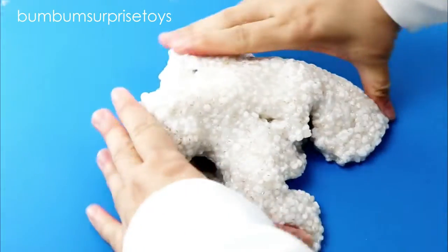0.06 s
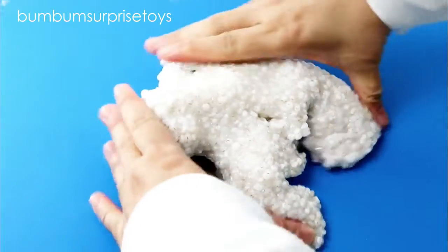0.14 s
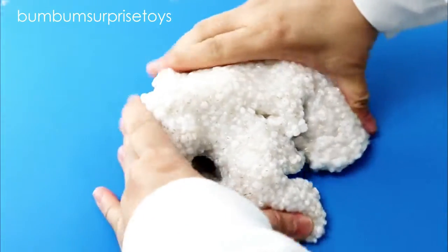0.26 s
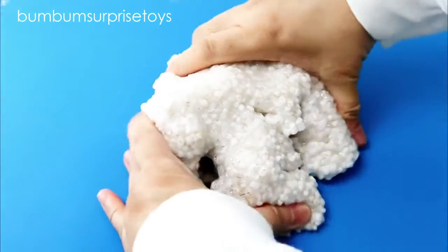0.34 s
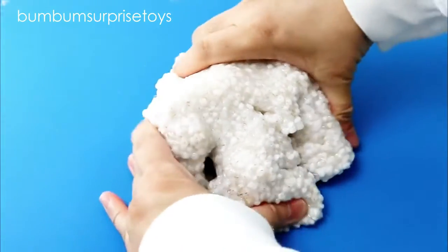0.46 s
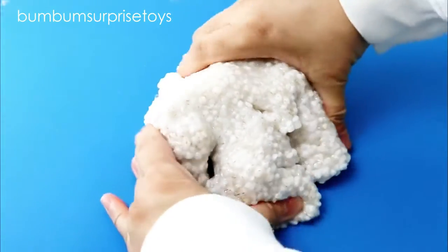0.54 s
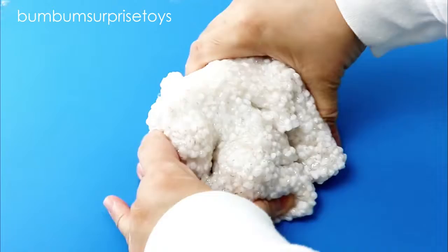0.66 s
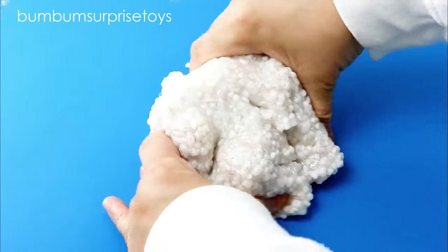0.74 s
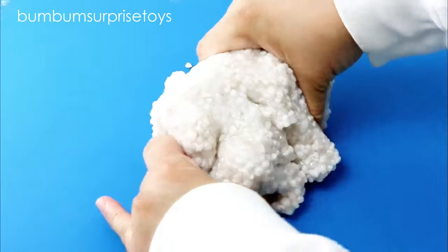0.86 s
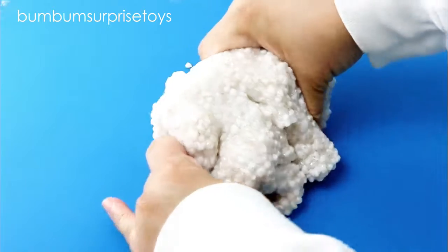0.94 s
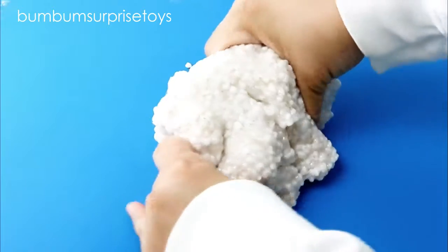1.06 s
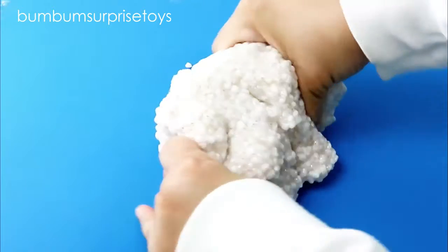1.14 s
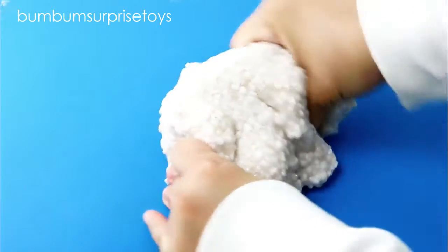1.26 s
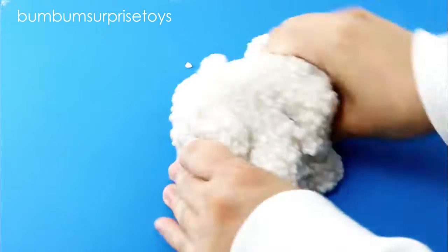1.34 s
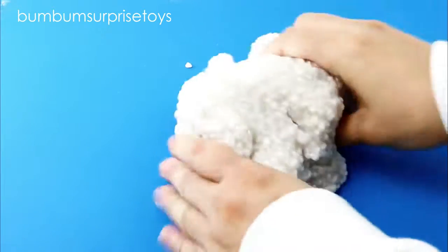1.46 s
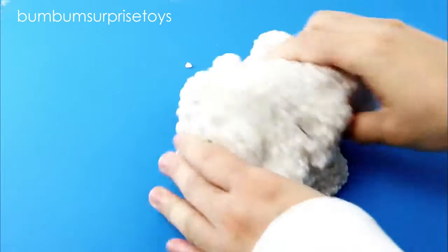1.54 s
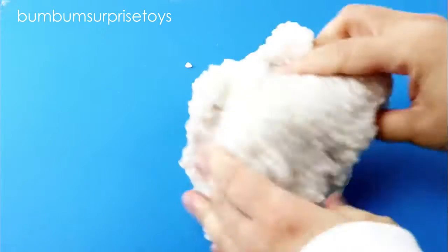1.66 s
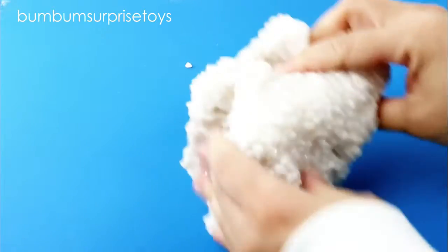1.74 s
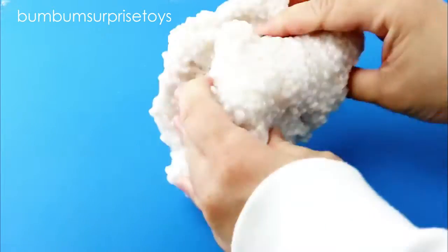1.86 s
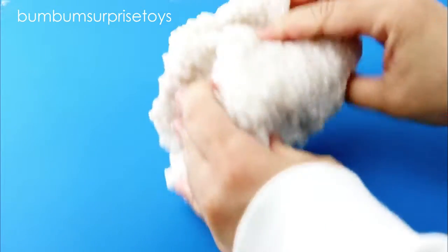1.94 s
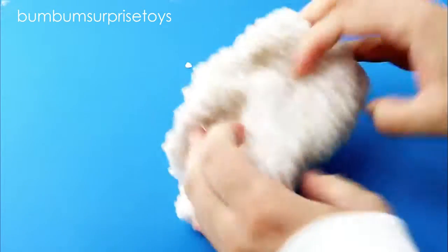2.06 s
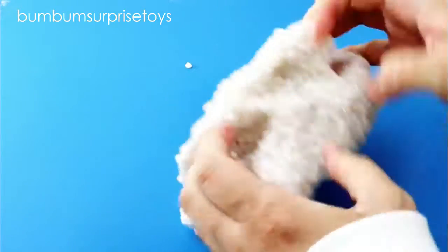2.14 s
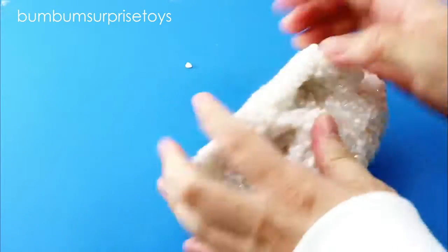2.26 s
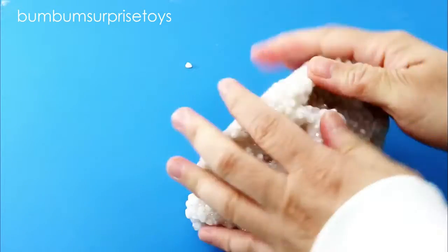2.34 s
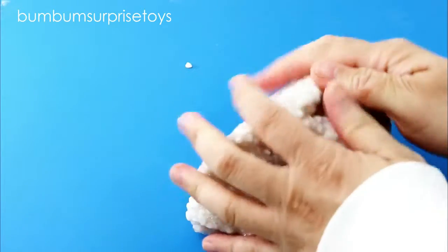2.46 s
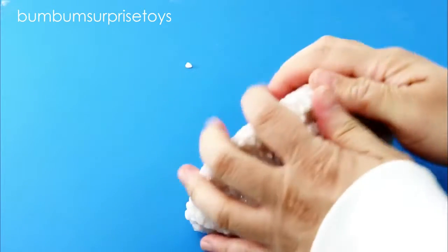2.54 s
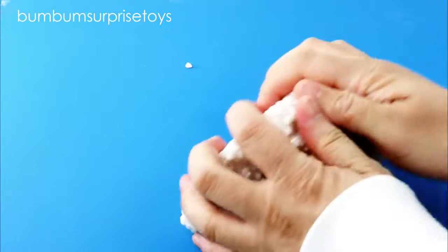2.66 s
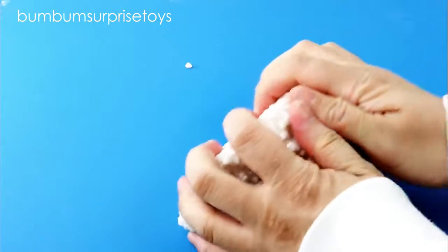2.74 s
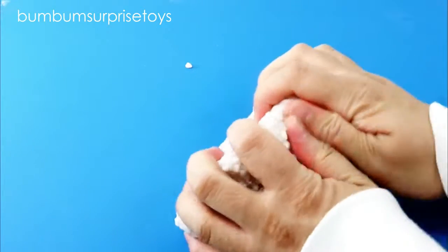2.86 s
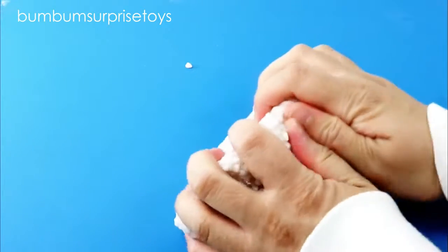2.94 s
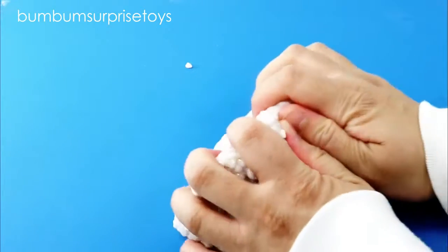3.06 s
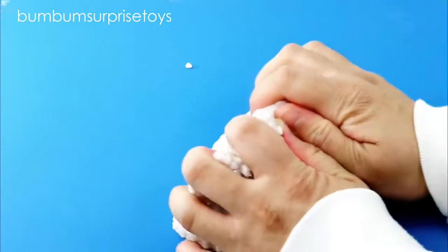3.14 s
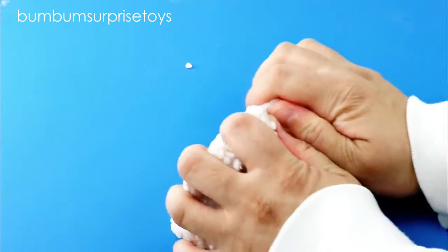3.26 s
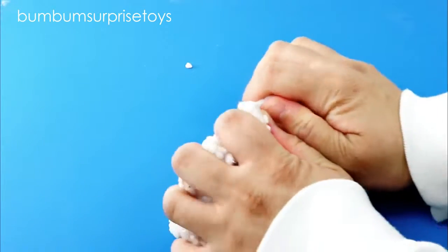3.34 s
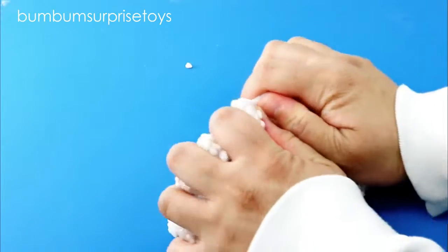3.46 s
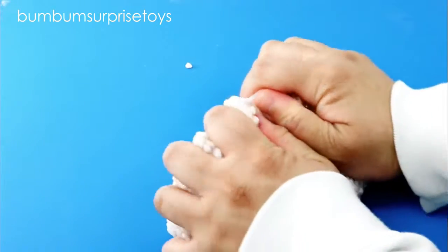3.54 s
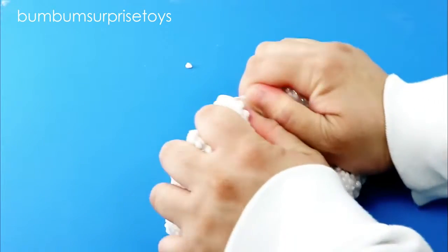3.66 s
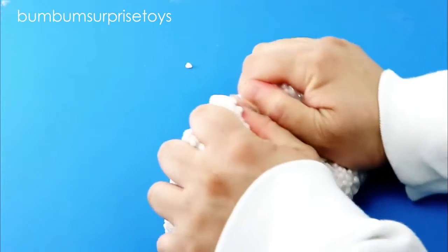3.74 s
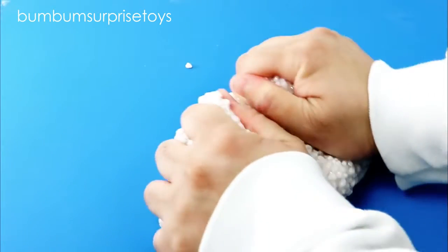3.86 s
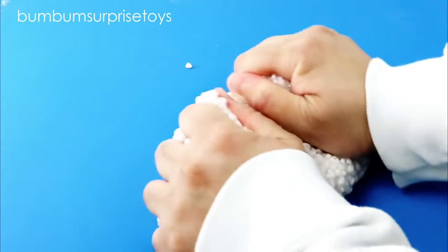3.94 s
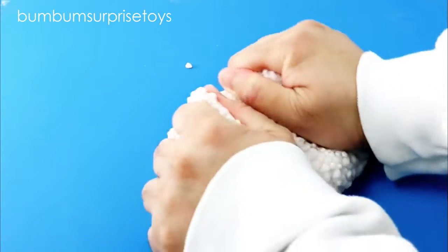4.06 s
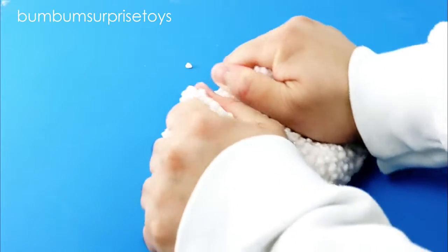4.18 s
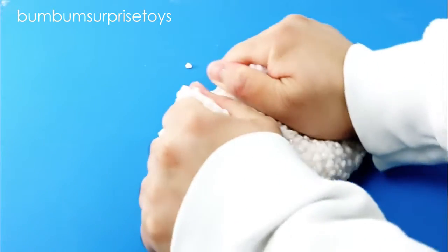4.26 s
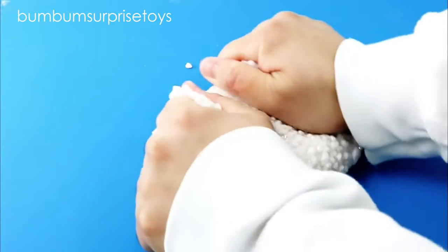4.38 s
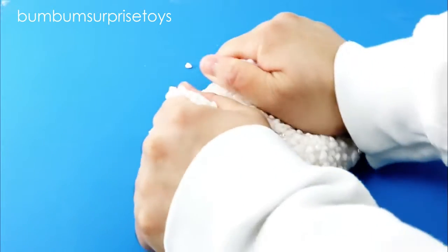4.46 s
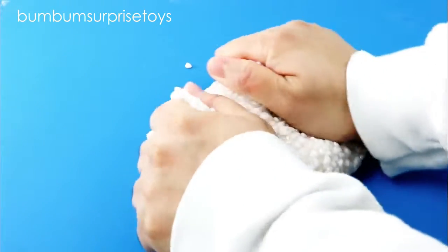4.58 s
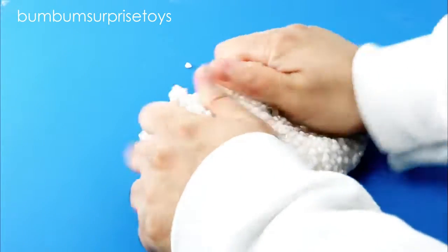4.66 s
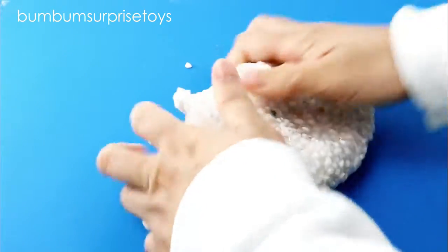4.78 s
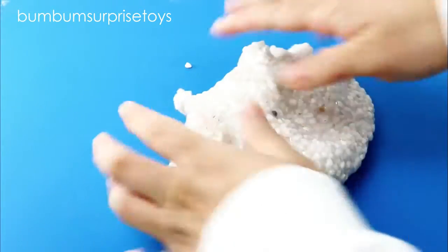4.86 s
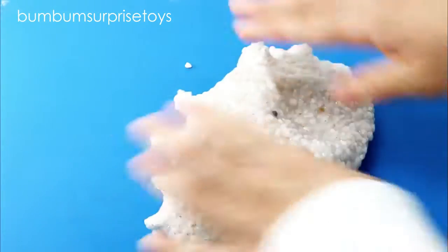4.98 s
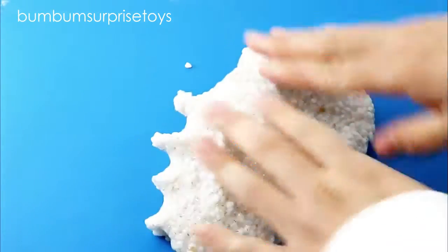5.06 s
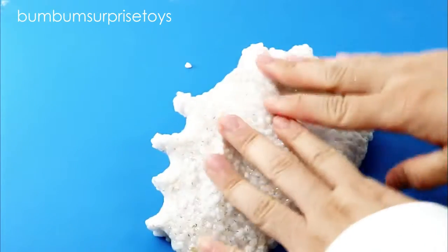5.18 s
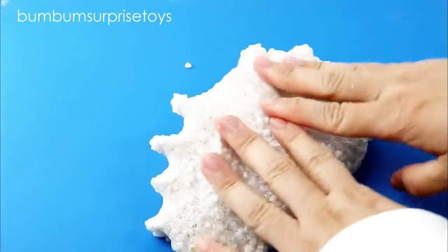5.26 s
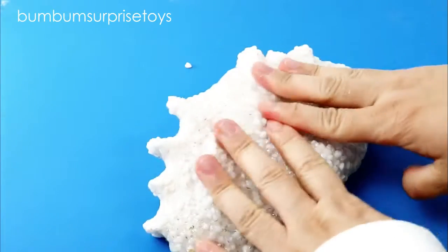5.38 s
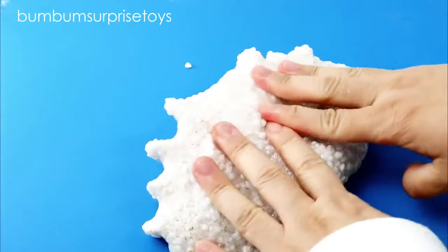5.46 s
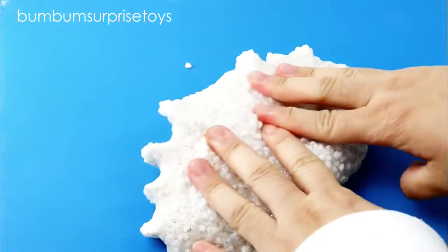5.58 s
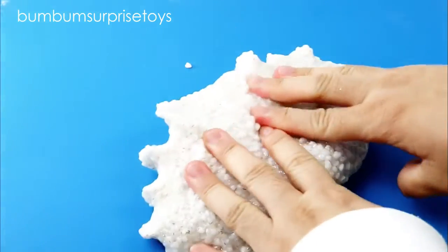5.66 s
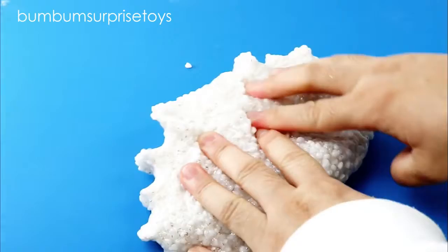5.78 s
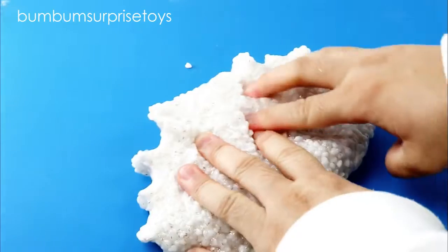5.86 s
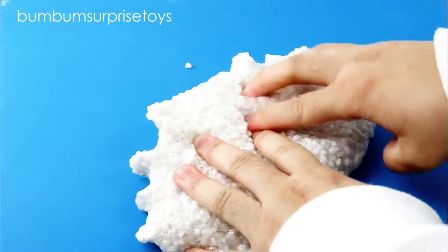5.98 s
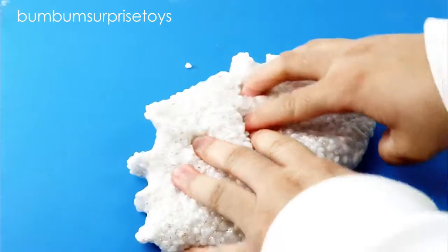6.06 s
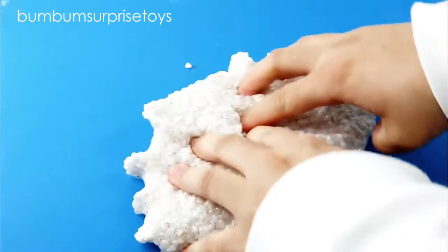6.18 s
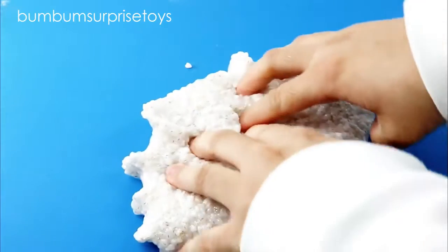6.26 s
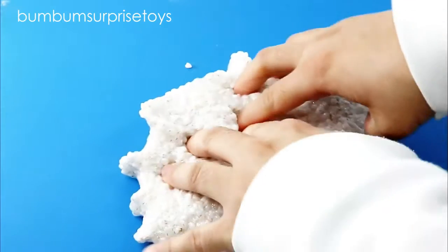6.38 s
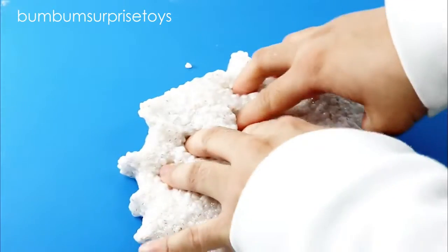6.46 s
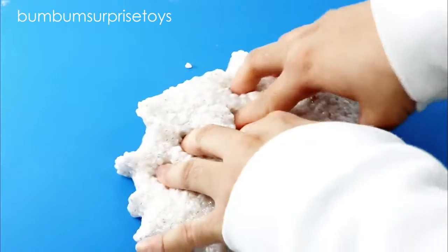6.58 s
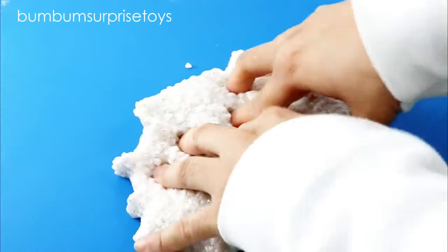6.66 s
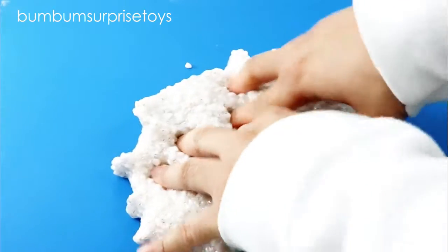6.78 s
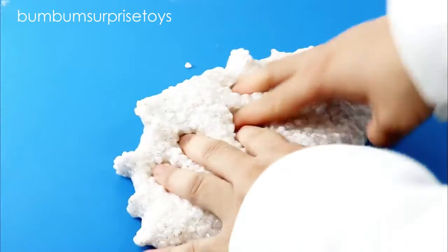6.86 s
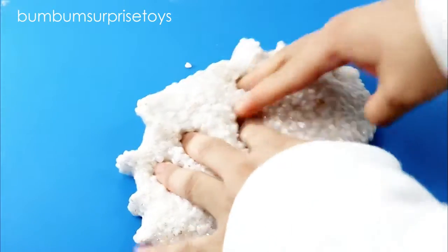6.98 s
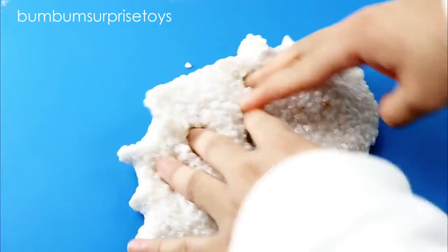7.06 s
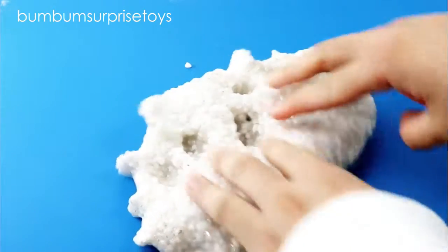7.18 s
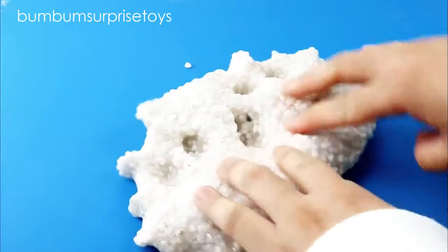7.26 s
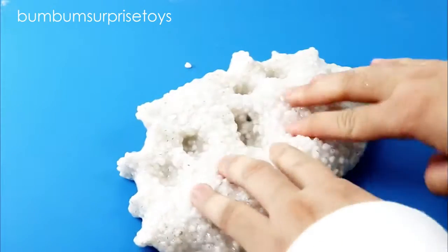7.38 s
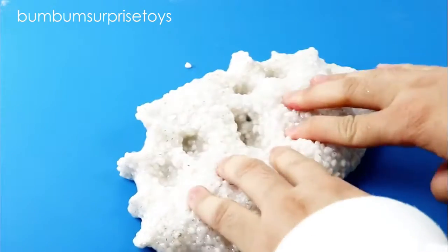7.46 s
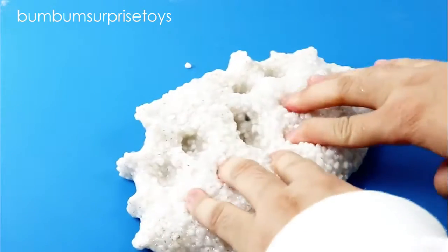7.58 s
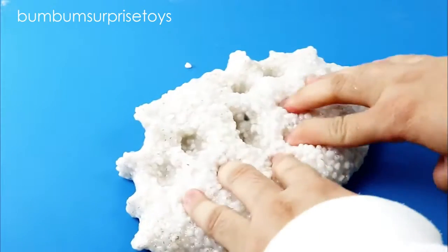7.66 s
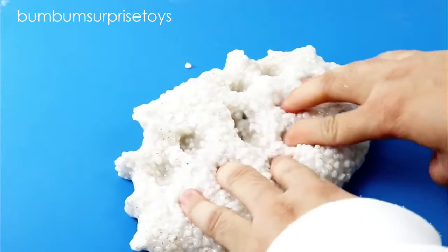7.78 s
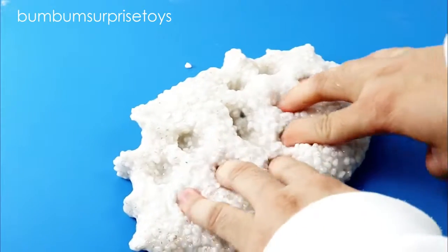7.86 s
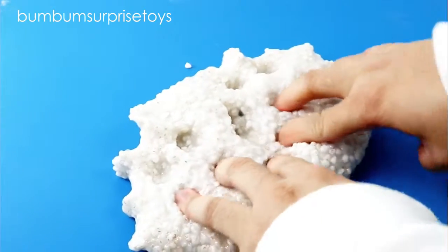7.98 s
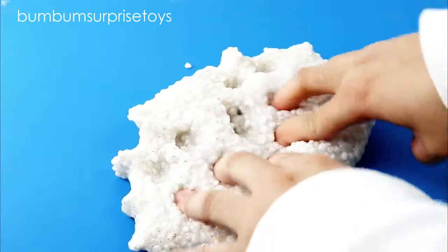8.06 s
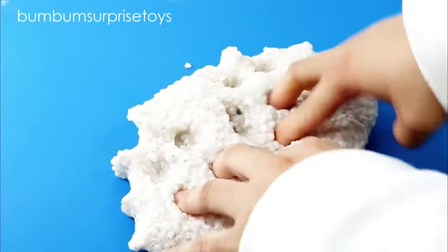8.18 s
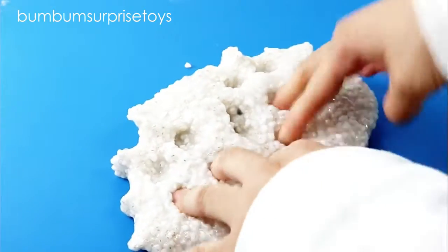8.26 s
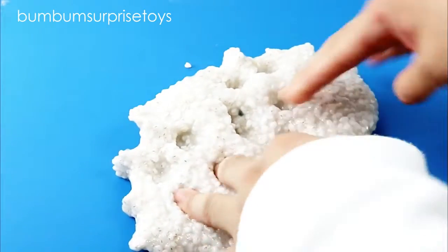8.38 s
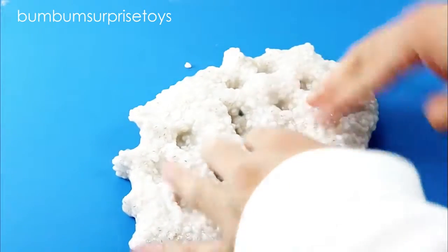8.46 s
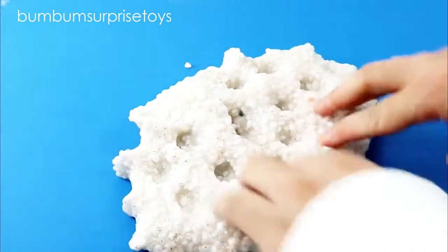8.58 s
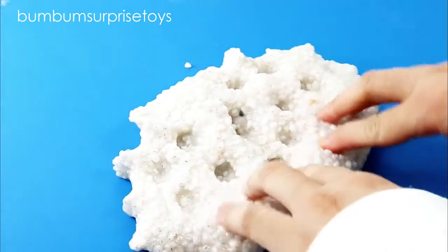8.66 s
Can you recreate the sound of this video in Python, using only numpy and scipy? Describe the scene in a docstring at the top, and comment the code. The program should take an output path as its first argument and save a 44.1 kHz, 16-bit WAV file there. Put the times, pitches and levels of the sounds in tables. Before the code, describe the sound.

Sticky slime full of foam beads crunches under squeezing hands. Dense crackle and hollow pops over low table friction thin to small clicks, then build to a cluster of hard, sharp snaps. After a quiet pause, finger presses bring short swelling crackles, a firm pop with a thump, and lighter ticks. Close stereo microphones, faint room air, short room reflections.

```python
"""Fine crackle and sharp pops are heard together: two hands knead slime packed with foam beads on a table.
Trapped air pockets burst as torn films that ring short cavity tones; countless small ones form the crackle.
The lump thumps the table when it lets go and rumbles when dragged, as filtered noise, over quiet air.
A small hard room adds near echoes and a tail that dies at its own speed in each band.
All is heard close to a stereo microphone, through a noise suppressor and a band limit."""
import sys
import numpy as np
from scipy import signal
from scipy.fft import rfft, irfft, next_fast_len
from scipy.io import wavfile
from scipy.ndimage import uniform_filter1d

SR = 44100
rng = np.random.default_rng(int(sys.argv[2]) if len(sys.argv) > 2 else 0)


def bounce(signal):
    """Save signal as a 16-bit WAV file at the path given by the first command-line argument."""
    frames = np.transpose(np.atleast_2d(signal))
    limited = np.clip(frames, -1, 1)
    pcm = np.round(limited * 32767).astype(np.int16)
    wavfile.write(sys.argv[1], SR, pcm)


N = 384993


def gain_of(db):
    """Level is logarithmic: 20 dB is a factor of ten in amplitude."""
    return 10 ** (np.asarray(db) / 20)


def panned(db, pan_db):
    """Level difference: half the left-right dB raises the left and half lowers the right."""
    return gain_of(db + np.array([[pan_db], [-pan_db]]) / 2)


def evened(x):
    """Power normalisation: scales to rms 1."""
    return x / np.sqrt(np.mean(x ** 2) + 1e-20)


def read(points, hz):
    """Logarithmic frequency scale: interpolates a spectrum table along it."""
    f, value = np.transpose(points)
    return np.interp(np.log(hz + 1), np.log(f + 1), value)


def add(mix, s, sound):
    """Superposition: mixes a two-channel sound in at second s."""
    part = mix[:, round(s * SR):][:, :sound.shape[1]]
    part += sound[:, :part.shape[1]]


def correlated(a, b, same):
    """Partial correlation: the second channel shares the fraction same of the first."""
    return np.array([a, same * a + np.sqrt(1 - same ** 2) * b])


def coloured(points, same):
    """Spectral shaping: two channels of partly alike white noise are filtered to a spectrum, rms 1."""
    pair = correlated(*rng.standard_normal((2, N)), same)
    size = next_fast_len(N)
    shape = gain_of(read(points, np.fft.rfftfreq(size, 1 / SR)))
    return evened(irfft(rfft(pair, size) * shape, size)[:, :N])


def cavity(hz, cycles, rise=0.48):
    """Damped resonance: an opened pocket rings for a few cycles (1/e decay; rise in cycles), energy 1."""
    cycles = max(cycles, .3)
    u = np.arange(int(7 * cycles * SR / hz) + 24) * hz / SR  # time in cycles
    ring = np.sin(2 * np.pi * u) * (1 - np.exp(-u / rise)) * np.exp(-u / cycles)
    # a small source radiates no bass
    sound = signal.lfilter(*signal.butter(3, hz / 1.403, "highpass", fs=SR), ring)
    return sound / np.linalg.norm(sound)


def crackle(per_s=11000, size_db=4.0, cycles=1.9, wander_db=4.5, octaves=0.66, fizz_hz=7500,
            fizz_octaves=0.77, clump_db=2.0, count=20, swell_db=22.5, release_db_per_s=192):
    """Random impulse trains excite resonances: small pockets about a typical size, and fizz of threads."""
    # crunches of the lump: full strength at t/s, swell/s, hold/s, level before scatter/dB,
    # typical pocket f/Hz, fizz of snapping threads re crackle/dB
    crunches = [(0.0, .01, 0.006, -52.5, 1950, -10), (0.097, 0.011, 0.085, -66, 1520, -30),
                (0.246, 0.25, 0.11, -47, 2450, -9.5), (0.51, 0.29, 0.13, -42, 2500, -2),
                (0.713, .05, 0.054, -52, 1330, -10), (0.769, 0.24, 0.18, -42, 2820, 0.5),
                (1, .05, 0.35, -43.5, 3500, 3), (1.533, 0.054, 0.012, -38.5, 4320, -9.5),
                (1.882, .03, 0.014, -63.5, 6500, -10.5), (2.142, 0.063, 0.017, -60.5, 1520, -1.5),
                (2.265, .02, 0.054, -74, 9600, -9), (2.489, 0.039, 0.0047, -54, 5220, 24),
                (2.83, 0.056, 0.0074, -71, 2280, -26), (3.001, 0.095, 0.033, -50, 5740, 0),
                (3.129, 0.043, 0.14, -54, 3430, -7), (3.324, 0.04, 0.1, -55.5, 5000, 27),
                (3.443, .04, 0.022, -60.5, 2020, -20), (3.504, 0.048, 0.18, -41, 5000, -5),
                (3.791, 0.064, 0.084, -37.5, 5650, -3), (4.05, 0.09, 0.1, -48, 6960, 21),
                (4.314, .03, 0.13, -51.5, 7400, 17), (4.522, 0.11, 0.049, -53, 1220, -4.5),
                (4.672, .05, .06, -77, 4300, -20.5), (4.817, .05, 0.074, -45.5, 2720, -3.5),
                (4.994, 0.19, 0.015, -52.5, 2520, -29.5), (5.745, 0.44, 0.19, -71.5, 1227, -13.5),
                (5.974, 0.021, 0.016, -62, 4260, -38), (6.045, .1, 0.3, -63.5, 2500, -36.5),
                (6.313, 0.2, 0.077, -48.5, 2500, -5.5), (6.45, 0.055, 0.11, -53.5, 3300, -43),
                (6.758, 0.21, 0.078, -48.5, 2730, -17), (7.077, 0.069, 0.087, -48, 2950, -2),
                (7.192, .03, 0.022, -56, 5500, -20), (7.285, 0.0077, 0.03, -44.5, 3250, -14),
                (7.73, .03, 0.049, -64, 5340, -18), (7.72, 0.023, 0.18, -65, 1350, -21.5),
                (7.9, 0.073, 0.13, -58, 1500, -6), (8.09, 0.15, 0.048, -49.5, 2010, -15.5),
                (8.206, 0.24, 0.018, -44.5, 3040, -34), (8.448, 0.04, 0.052, -58, 6160, -2)]
    s, swell, hold, db, centre_hz, fizz_db = np.transpose(crunches)[:, :, None]
    t, pitches = np.arange(0, N + 128, 128) / SR, np.geomspace(450, 14500, count)

    before = np.maximum(s - t, 0) / np.maximum(swell, .002)  # fraction of the swell still to come
    after = np.maximum(t - s - abs(hold), 0)
    level = gain_of(db - swell_db * before - release_db_per_s * after) * (before < 1)

    pockets = np.exp(-.5 * (np.log2(pitches / centre_hz) / octaves) ** 2)
    threads = np.exp(-.5 * (np.log2(pitches / fizz_hz) / fizz_octaves) ** 2)
    share = pockets + gain_of(fizz_db) * threads
    power_share = share ** 2 / (share ** 2).sum(1, keepdims=True)
    strengths = np.sqrt(power_share.T @ level ** 2)  # the powers of overlapping crunches add

    # pockets of one size give way in clumps
    unevenness = evened(uniform_filter1d(rng.standard_normal(strengths.shape), size=8, axis=1))
    out = np.zeros((2, N))
    for hz, strength in zip(pitches, strengths * gain_of(clump_db * unevenness)):
        chance, size, side = rng.random(N), rng.exponential(1, N), rng.standard_normal(N)
        train = evened((chance < per_s / count / SR) * gain_of(size_db * np.minimum(size, 5)))
        spread = gain_of(wander_db * np.array([side - .15, .15 - side]))  # left and right
        pair = train * np.interp(np.arange(N) / SR, t, strength) * spread
        out += signal.oaconvolve(pair, cavity(hz, cycles)[None], axes=1)[:, :N]
    return out


def air(level_db=-72.5):
    """Stationary noise: the quiet room is a steady coloured noise, much alike on both sides."""
    # spectrum of the quiet room: f/Hz, relative level/dB per Hz
    air_spectrum = [(20, -29.5), (60, -7), (120, -18.5), (175, -4), (250, -10), (345, -2.5), (430, -16.5),
                    (1100, -13), (1600, -16), (2200, -28), (16000, -37.5)]
    return gain_of(level_db) * coloured(air_spectrum, 0.87)


def drag():
    """Friction noise: the sticky lump rubs the table, which rumbles unevenly."""
    # dragging on the table top, before the unevenness: t/s, level/dB
    drag_levels = [(0.0, -86), (0.39, -59), (0.53, -47.5), (0.82, -44.5), (1.26, -57.5), (1.7, -82),
                   (2.87, -73), (3.04, -67), (3.67, -61), (4.8, -64.5), (5.4, -81), (6.12, -65), (6.6, -58),
                   (7.1, -59), (7.56, -82.5), (8.27, -52.5), (8.51, -72.5), (8.73, -92.5)]
    # spectrum of the table rumble: f/Hz, relative level/dB per Hz
    table_spectrum = [(18, -49.5), (30, -19.5), (113, -9), (256, -2), (349, -1.5), (767, 1.5), (874, 0.5),
                      (1500, 3.5), (1950, -33.5), (3300, -120)]
    s, db = np.transpose(drag_levels)
    level_db = np.interp(np.arange(N) / SR, s, db)
    lumps = evened(uniform_filter1d(rng.standard_normal(N), 900))
    return coloured(table_spectrum, .93) * panned(level_db + 2.8 * lumps, -2.2)


def pops(snap_from=0.4, snap_to=3.0, later_db=-11, tear_ms=1.1):
    """Impulse excitation: each film tears in a few quick steps that snap and ring the cavity."""
    # bursting air pockets: t/s, peak level/dB, cavity f/Hz, left-right/dB, ring/cycles,
    # snap of the film re ring/dB
    bursts = [(0.0725, -8, 1830, -1, 0.56, -5.5), (0.4801, -32, 1320, -6, 1.2, 2),
              (0.5255, -22, 3530, -1.0, 1.6, -10), (0.5692, -11.5, 4380, -1.0, 1.5, 1),
              (0.633, -24, 4140, 2, 2.4, -21), (0.6574, -28.5, 790, -8, 0.65, -4),
              (0.7563, -23, 4360, 4, 1.3, -24), (0.8235, -17, 2870, -0.5, 1, 10),
              (0.9005, -23, 5650, -1.5, 0.76, -10), (0.9964, -25, 8500, -1, 1.5, -6),
              (1.02, -10, 4850, -6, 0.84, 19), (1.044, -17, 3500, -5, 2.7, 5),
              (1.1306, -19.5, 1600, -8, 1.3, -5), (1.157, -6.5, 2860, -1, 1.3, 12),
              (1.2134, -18, 3650, -1.5, 1.3, -4), (1.26, -37, 5200, -2.0, 0.76, -6),
              (1.2815, -8.5, 5600, -3, 0.43, -11), (1.3356, -13, 5750, -3, 0.43, -12),
              (1.3806, -23.5, 3700, -5, 3.7, -3.5), (1.5214, -25.5, 8450, 19, 2.7, -16),
              (1.6377, -27.5, 7190, -4, 2.8, -10), (1.7954, -31, 8100, -12, 0.89, -7),
              (1.8956, -36, 4700, 4, 1.1, -5), (2.0304, -42, 5720, -8.5, 3.9, -21),
              (2.2313, -36, 3190, -3, 3.4, -19), (2.457, -30.5, 9900, -6.5, 1.6, -3),
              (2.5167, -24.5, 5700, 2, 3.9, -10.5), (2.6574, -10.5, 11700, -2, 0.43, 11),
              (2.7747, -28, 8140, 2.0, 0.6, -17), (2.8284, -29.5, 11400, 1, 1.3, -16),
              (2.9163, -31.5, 8310, 7, 1.8, -18), (2.9658, -24, 5500, -5, 1.1, -1),
              (3.0037, -24.5, 9500, 5, 1.1, 1), (3.0779, -31, 2480, -6, 1.4, -7),
              (3.1312, -24.5, 3660, 0, 2.4, 6), (3.2146, -27.5, 2820, -7, 3.9, -11),
              (3.2967, -20, 7500, -2, 0.76, 4), (3.3867, -35, 4900, -6, 3.8, -17),
              (3.4151, -31.5, 9050, -1.0, 1.3, -4), (3.459, -40, 2100, -8, 3.2, -11),
              (3.48, 0.5, 3810, -3.0, 0.43, 2), (3.498, -8.5, 7300, 1.0, 0.99, -16),
              (3.5944, -12, 4740, 2, 1.9, 5), (3.6101, -0.5, 4900, -0.5, 2.2, 6),
              (3.7609, -16.5, 8600, 0.0, 1, 1), (3.7824, 5.5, 6850, 6.5, 0.43, 6),
              (3.9158, -10, 7600, 0.0, 1, 13), (3.9722, -26.5, 8400, 16.5, 0.77, -11),
              (4.0397, -3.5, 7150, 0, 0.68, -38), (4.0828, -14, 8040, 1, 1.3, -21),
              (4.12, -10.5, 11600, 1.0, 0.75, -1), (4.1742, -19.5, 7260, 0.0, 0.99, -8),
              (4.1965, -16.5, 7380, 0.5, 0.69, 4), (4.3106, -4.5, 8700, 1.5, 0.77, -3.5),
              (4.3874, -19, 9350, 1.0, 0.85, -22), (4.4288, -10.5, 8700, 1, 0.5, -6),
              (4.5096, -23.5, 9510, 15, 0.86, -8), (4.8322, -32, 1940, -3, 1.25, -4),
              (4.999, -27, 3160, -2.5, 3, -11), (5.0195, -26.5, 2448, -14, 1.3, -16.5),
              (5.9708, -33, 4240, 0.5, 1.3, -22), (6.0967, -31, 10100, -2, 1.3, -5),
              (6.227, -21, 12100, -3, 0.73, 4), (6.2558, -30, 4190, 7, 1.5, -10),
              (6.2898, -27, 3900, -4, 1.6, 8), (6.316, -23.5, 10000, -0.5, 2, -18),
              (6.3484, -24, 8900, -0.5, 1.1, -23), (6.6163, -31.5, 4600, 7, 2.3, -16),
              (6.6952, -23, 4800, 0, 0.63, -23), (6.786, -21.5, 2620, 0, 0.85, 0),
              (6.9277, -59, 1340, 11, 2.4, 7), (7.0406, -36, 3470, -5, 2.8, -4),
              (7.2173, -25.5, 5830, 3, 1.8, -19), (7.2919, -6, 2730, -2, 0.68, 12),
              (7.8235, -25, 11500, -11, 0.93, -9.5), (7.855, -25.5, 13400, 2.0, 1.3, -17),
              (8.1883, -25, 4430, 4, 1.7, -24), (8.2454, -22, 2450, -8, 0.51, -16),
              (8.308, -42.5, 1270, 2, 0.89, -14), (8.5894, -35, 6000, 7, 2.4, -12),
              (0.2074, -27, 5670, -8, 1.6, 18), (0.3426, -30, 3650, -10, 1.3, 9),
              (0.4304, -40, 3570, -11, 1.3, -8), (0.4803, -27, 3520, -13, 2.4, 9),
              (1.924, -36.5, 6840, 4, 1.3, -8), (2.1201, -44, 10700, 2, 1.3, -8),
              (2.2877, -43.5, 10500, -16, 1.6, -10), (3.0475, -24.5, 11500, 5, 0.98, -6),
              (5.6984, -46, 8050, 2.5, 0.84, -7), (5.7663, -45, 13100, -6, 1.3, -7),
              (6.3869, -31, 5440, 2, 1.3, 8), (6.5191, -34, 4400, -1, 1.4, -7),
              (6.9272, -26, 7200, 0.0, 0.71, 9), (7.0085, -37, 12400, -6, 1.3, -13),
              (7.7114, -44, 3870, -2.5, 0.96, -2.5), (7.7258, -41, 5760, -6.5, 2.2, -18),
              (8.0995, -28, 7100, -0.5, 3.8, -18), (8.3988, -47, 9000, 4, 1.5, -6),
              (8.4402, -39, 5930, -7, 1.3, -6.5), (8.4796, -32, 6550, -3, 1.8, -4),
              (8.5599, -32.5, 8310, 2, 1.3, -5.5), (0.5871, -24, 1195, -4, 0.75, -5.5),
              (2.143, -41, 1560, -3.5, 1.5, -6), (2.9427, -36, 3390, -5, 1.3, 0),
              (4.5311, -35, 1180, 5.5, 1.3, -1.5), (6.3081, -33.5, 1340, -1.0, 1.5, -9),
              (7.1028, -33, 3270, -7.5, 2.6, -8), (7.7648, -41.5, 1305, -2, 1.8, 0),
              (8.0775, -33, 1570, -7.5, 1.1, -9)]
    near, far, ms = np.zeros((2, N)), np.zeros((2, N)), np.arange(400) * 1000 / SR
    draws, fade = rng.standard_normal((len(bursts), 2, 400)), np.exp(-ms / tear_ms)
    for (s, db, hz, pan_db, cycles, snap_db), (steps, hiss) in zip(bursts, draws):
        later = gain_of(later_db) * steps * (abs(steps) > 1.7)  # only the rare large draws are steps
        tearing = (later + 0.18 * hiss) * fade
        tearing[0] = -1  # the first and main step
        ring = np.pad(cavity(hz, cycles), (0, 200))
        band = signal.butter(3, [snap_from * hz, min(snap_to * hz, 15000)], "bandpass", fs=SR, output="sos")
        snap = evened(signal.sosfilt(band, np.arange(len(ring)) == 0)) / np.sqrt(len(ring))  # energy 1
        step = ring + gain_of(snap_db) * snap
        sound = np.convolve(tearing, step)
        gain = panned(db, pan_db) / abs(sound).max()
        add(near, s, gain * sound)
        # steps break at different spots, so the room gathers their power in the colour of one step
        add(far, s, gain * step * np.linalg.norm(sound) / np.linalg.norm(step))
    return near, far


def tail(scatter_db=-12, scatter_t60=.022, build_s=0.0068):
    """Diffuse reverberation: quick scatter from hands and lump, then a build-up and decay in each band."""
    # decay of the room: f/Hz, t60/s
    decay_times = [(150, 0.42), (600, 0.3), (1400, 0.35), (3700, 0.23), (9700, 0.25), (16000, 0.23)]
    # late room colour: f/Hz, level/dB
    late_levels = [(100, 3), (500, -6), (1500, -2), (4000, -6.5), (9000, -4), (16000, -7.5)]
    # left-right likeness of the room: f/Hz, likeness (0 to 1)
    likeness = [(60, 1), (300, 0.89), (1000, 0.29), (4000, 0.13), (16000, 0.47)]
    taps, s = np.zeros((2, SR // 2)), np.arange(SR // 2) / SR
    # one tap of random sign at a random place in every 16 samples
    at = np.arange(32, SR // 2 - 16, 16) + rng.integers(0, 16, (2, (SR // 2 - 33) // 16))
    np.put_along_axis(taps, at, rng.choice([-1., 1.], at.shape), 1)
    scatter = taps * gain_of(-60 * s / scatter_t60)

    hz, t, z = signal.stft(taps * (1 - np.exp(-s / build_s)), SR, nperseg=512)
    same = np.clip(read(likeness, hz), 0, 1)[:, None]  # close capsules share the bass of the room
    z = correlated(z[0], z[1], same) * gain_of(-60 * t / read(decay_times, hz)[:, None])
    norm = np.linalg.norm(signal.istft(z, SR, nperseg=512)[1][0])
    wet = z * gain_of(read(late_levels, hz))[:, None]
    late = signal.istft(wet, SR, nperseg=512)[1][:, :SR // 2] / norm
    return late + gain_of(scatter_db) * scatter / np.linalg.norm(scatter[0])


def room(x, far, turns_per_s=3.7):
    """Reflection: near echoes, and three random tails crossfaded in turn so that none colours every sound."""
    # table top and near things: delay t/s, level/dB
    echoes = [(.0018, -14), (.0036, -8.5), (.0052, -11.5), (.0075, -24.5)]
    near = np.zeros((2, 1024))
    for s, db in echoes:
        near[[0, 1], round(s * SR) + rng.integers(-3, 4, 2)] = gain_of(db)
    out = signal.oaconvolve(x, near, axes=1)[:, :N]
    for k in range(3):  # the squares of the three windows sum to 1
        window = np.sqrt(2 / 3) * np.cos(np.pi * (turns_per_s * np.arange(N) / SR + k / 3))
        out += signal.oaconvolve(far.mean(0)[None] * window, tail(), axes=1)[:, :N]
    return out


def thumps(knock=12.0, knock_s=0.0006):
    """Impact and decay: a dull knock, then the table top rumbles on without a clear pitch."""
    # the lump or a finger lets go of the table: t/s, level before a common trim/dB,
    # bottom f/Hz, top f/Hz, t60/s
    releases = [(.656, -21.5, 194, 960, 0.076), (1.518, -46.5, 105, 620, 0.25),
                (2.885, -46.5, 91.5, 700, 0.67), (4.509, -44.5, 368, 1290, 0.71),
                (4.82, -51.5, 50, 300, 0.27), (5.011, -51.5, 50.3, 300, .2), (5.648, -52.5, 80, 506, .15),
                (6.329, -49, 196.7, 874, .15), (6.927, -34.5, 90, 1130, 0.12), (7.291, -23, 75, 620, 0.3),
                (7.597, -62, 153.7, 435, 0.1), (8.307, -32.5, 109, 1320, 0.12)]
    out, t = np.zeros((2, N)), np.arange(SR // 3) / SR
    noises = rng.standard_normal((len(releases), len(t)))
    for (s, db, low_hz, top_hz, t60), noise in zip(releases, noises):
        band = signal.butter(2, [low_hz, top_hz], "bandpass", fs=SR, output="sos")
        envelope = gain_of(-60 * t / t60) + knock * np.exp(-t / knock_s)
        sound = signal.sosfilt(band, noise * envelope)
        # levels refer to the first 20 ms
        add(out, s, panned(db - 8.5, -2.4) * sound / np.std(sound[:SR // 50]))
    return out


def overloads():
    """Asymmetric overload: one-sided pulses at the loudest pops, a low dry thud with no room behind it."""
    # pulses: t/s, peak level/dB, rise to the peak/ms, left-right/dB
    pulses = [(3.4801, -19, 0.15, -15), (3.6111, -0.5, 0.033, -5.5), (3.7851, -43, 0.2, 2.5)]
    out = np.zeros((2, N))
    for s, db, rise_ms, pan_db in pulses:
        u = np.arange(200) / SR / (rise_ms / 1000)
        add(out, s, panned(db, pan_db) * u * np.exp(1 - u))
    return out


def scene():
    """Superposition: the slime in the room over table rumble and quiet air."""
    near, far = pops()
    rest = crackle() + thumps()
    slime = near + rest + room(near + rest, far + rest)
    return slime + overloads() + drag() + air()


def record(dry, slope=.8, most_db=14, edge_hz=16050):
    """Downward expansion: bins under a threshold are lowered; then full-scale clipping and a low-pass."""
    # suppressor threshold: f/Hz, level/dB per bin
    thresholds = [(1200, -110), (2200, -97), (6000, -98.5), (16000, -86)]
    hz, t, z = signal.stft(dry, SR, nperseg=512, noverlap=384)
    power = (abs(z) ** 2).mean(0)
    for axis in (0, 1):  # smoothed over frequency, then time
        power = uniform_filter1d(power, size=7, axis=axis)
    under_db = read(thresholds, hz)[:, None] - 10 * np.log10(abs(power) + 1e-16)
    lowered = z / gain_of(np.clip(slope * under_db, 0, most_db))
    hushed = signal.istft(lowered, SR, nperseg=512, noverlap=384)[1][:, :N]
    held = np.clip(hushed, -1, 1)
    low_pass = signal.firwin(255, edge_hz, window=("kaiser", 8), fs=SR)
    return signal.oaconvolve(held, low_pass[None], "same")


dry = scene()
out = record(dry)
bounce(out)
```